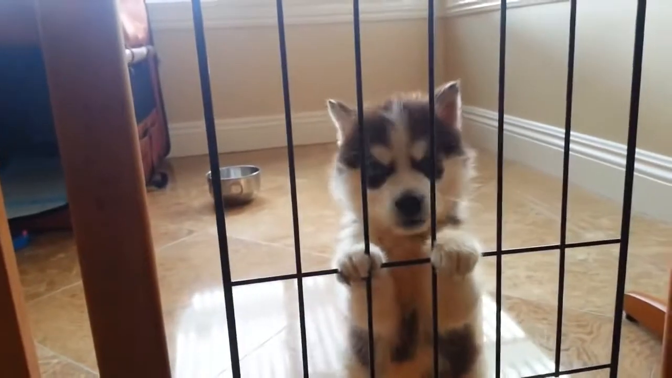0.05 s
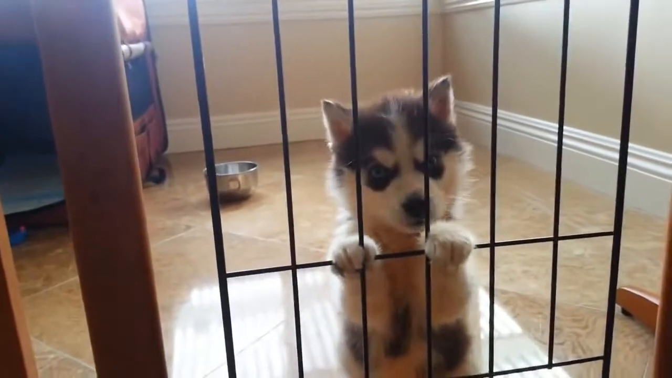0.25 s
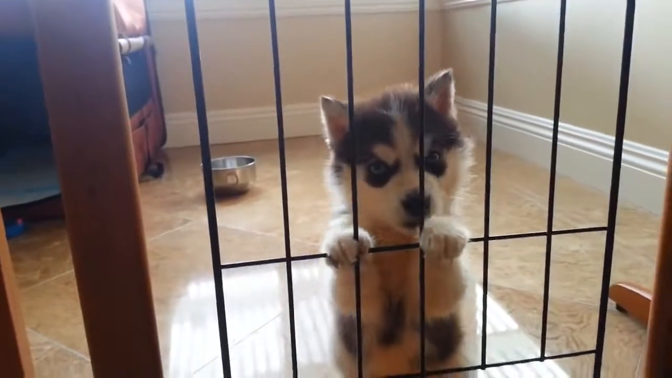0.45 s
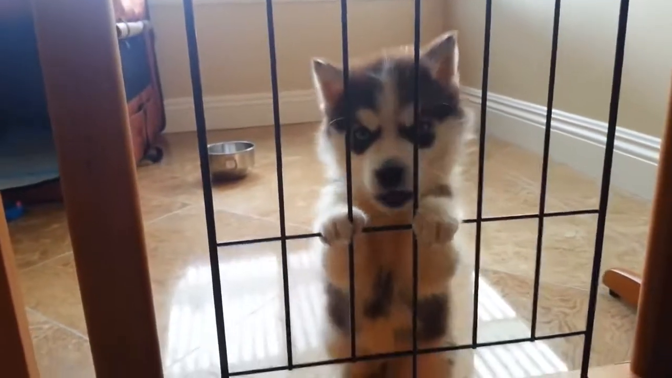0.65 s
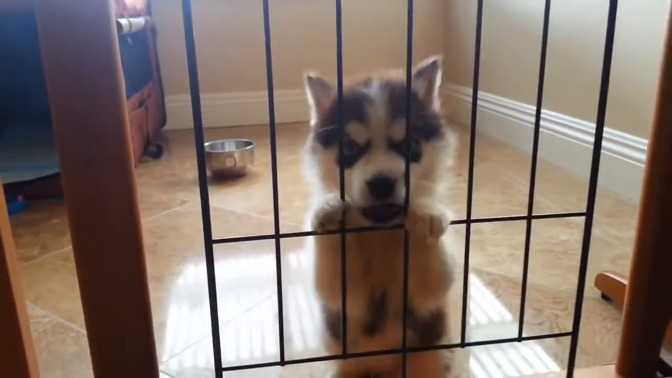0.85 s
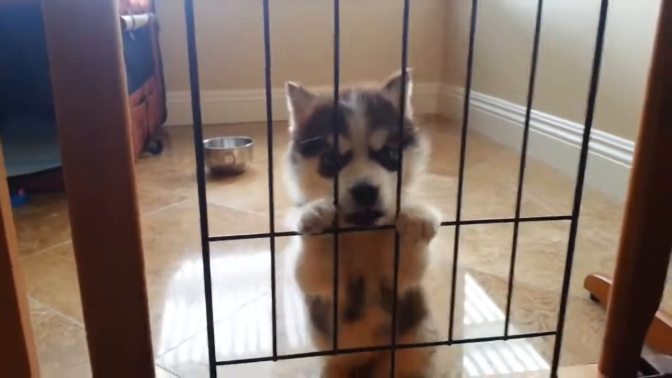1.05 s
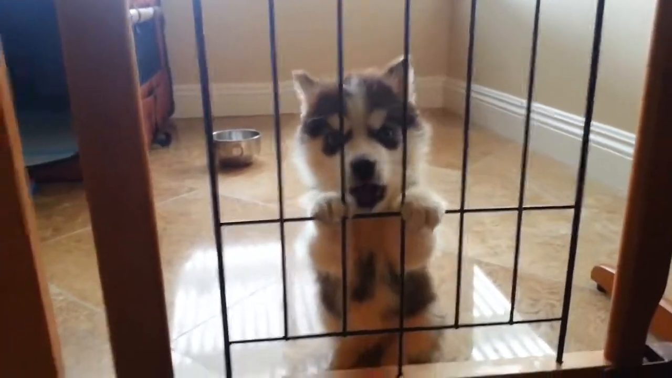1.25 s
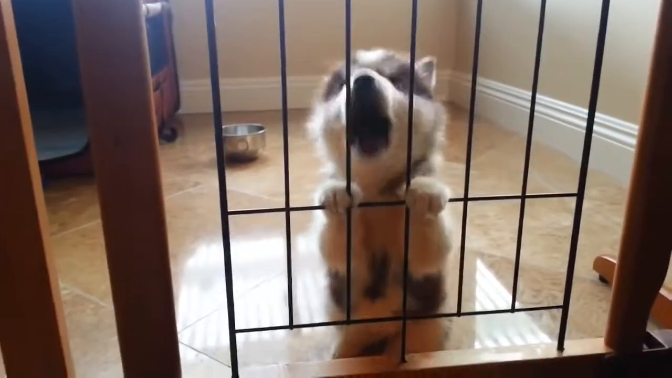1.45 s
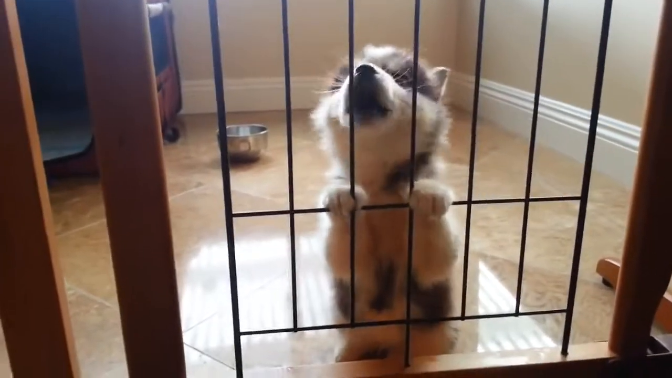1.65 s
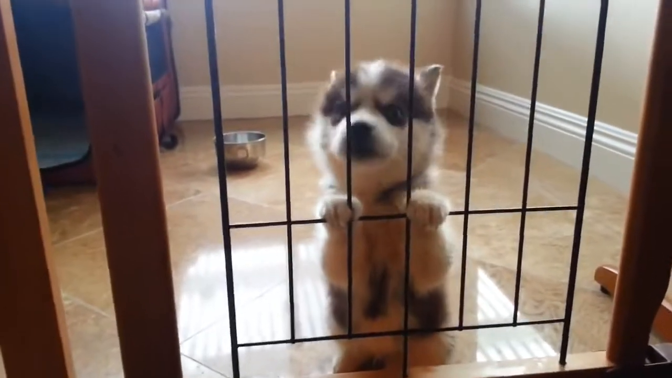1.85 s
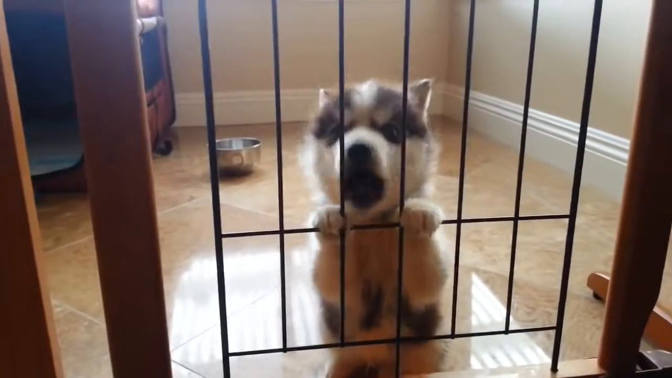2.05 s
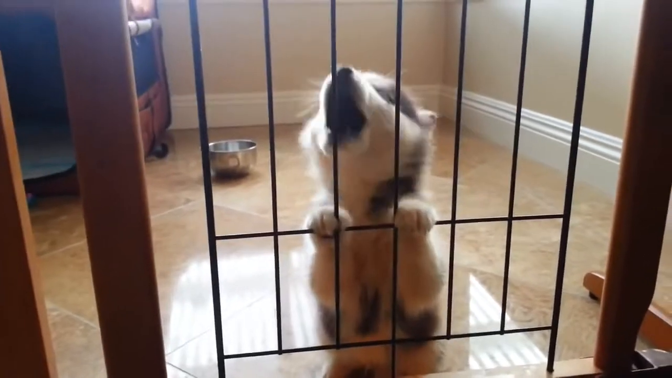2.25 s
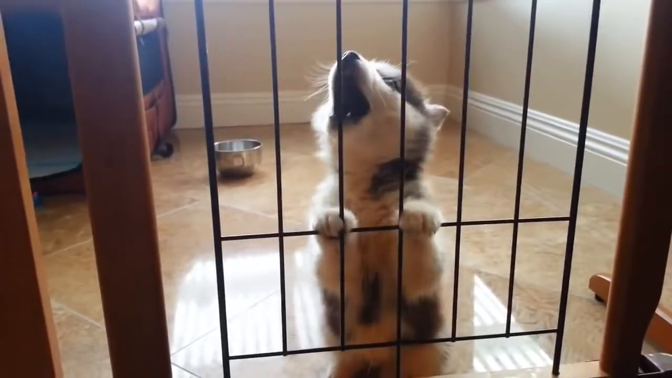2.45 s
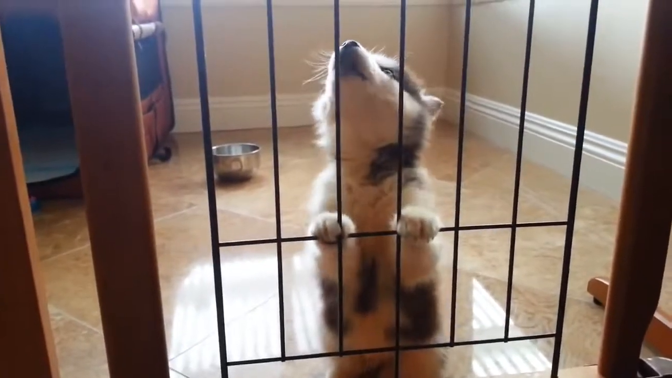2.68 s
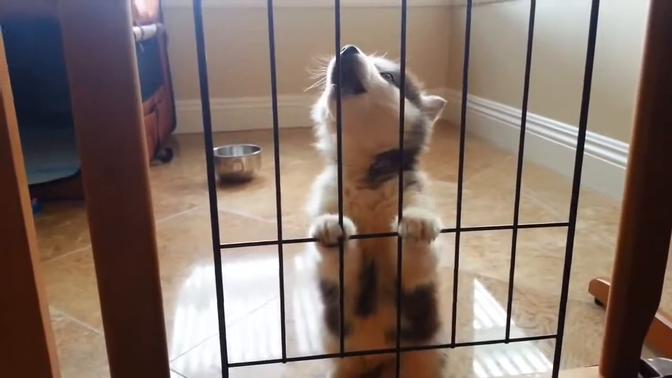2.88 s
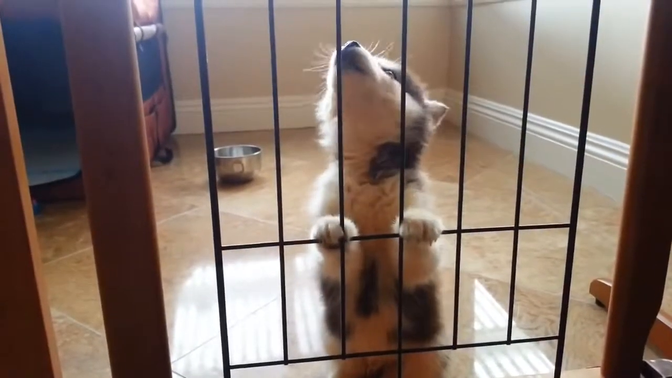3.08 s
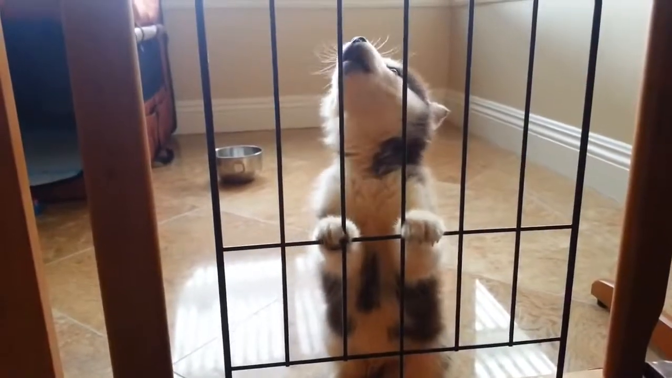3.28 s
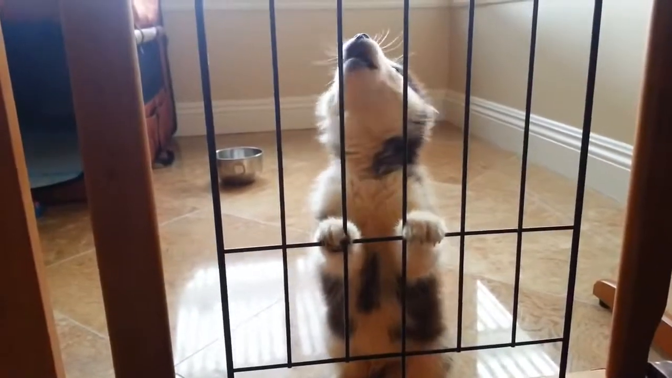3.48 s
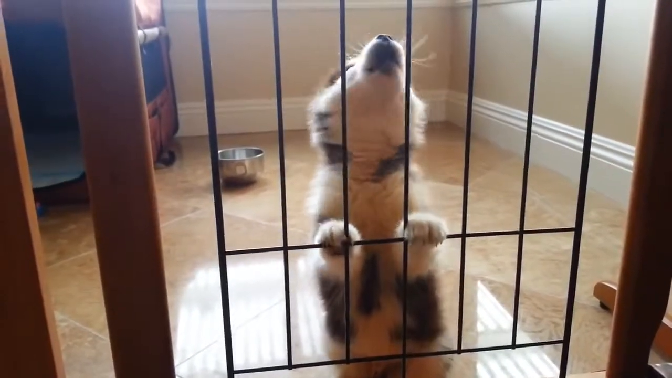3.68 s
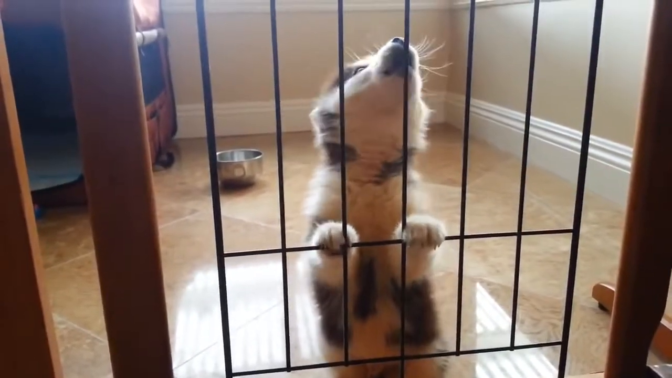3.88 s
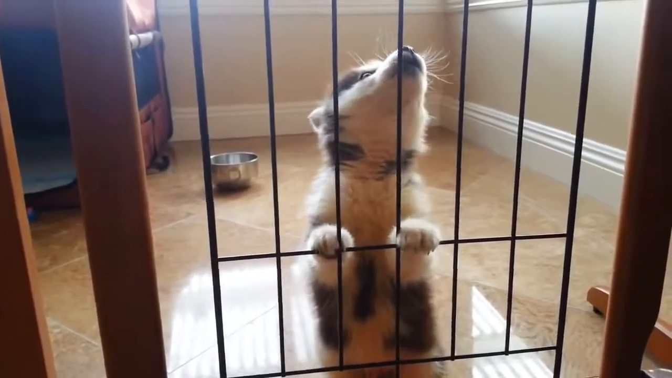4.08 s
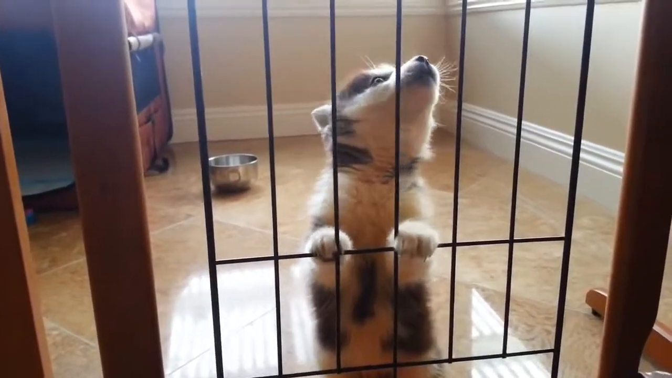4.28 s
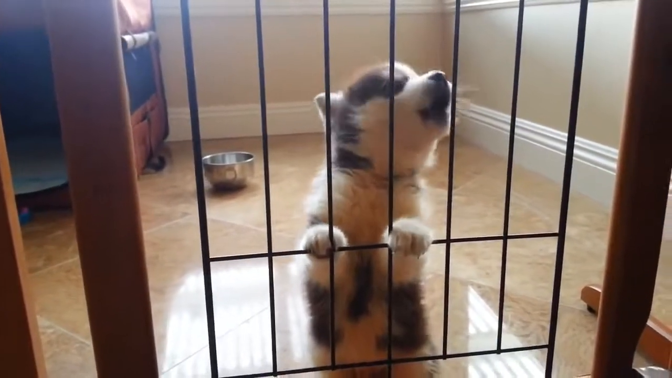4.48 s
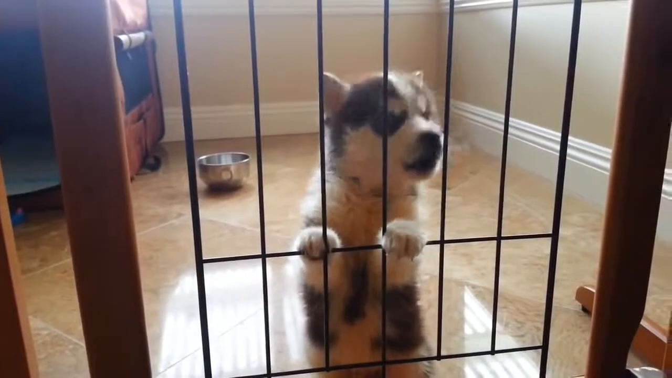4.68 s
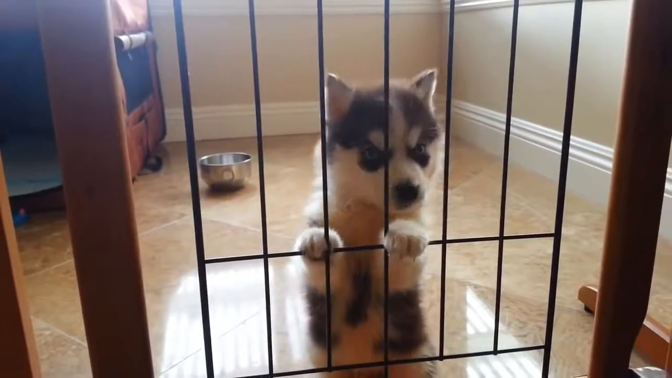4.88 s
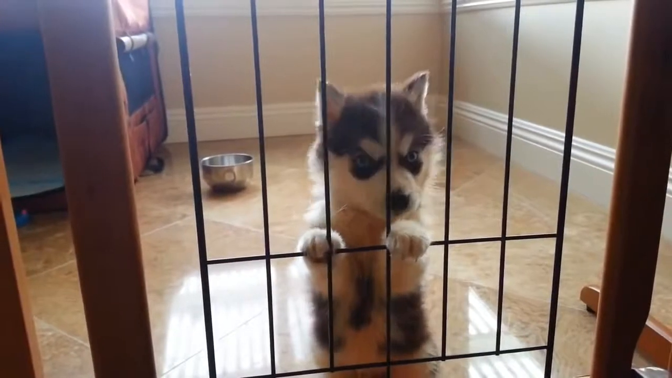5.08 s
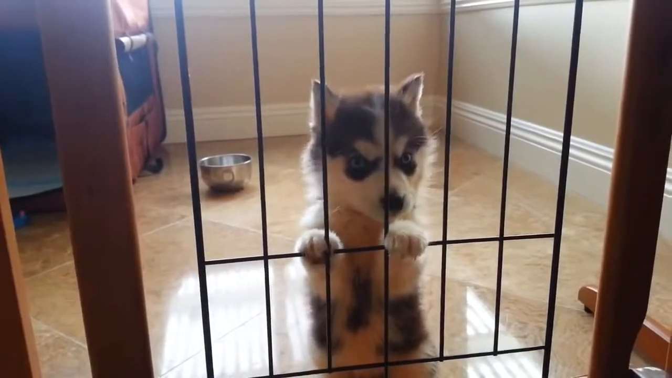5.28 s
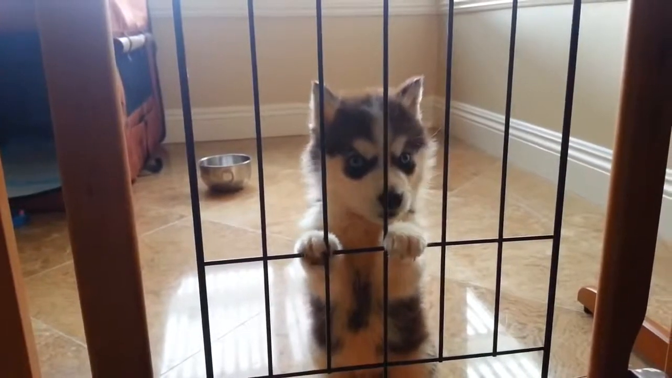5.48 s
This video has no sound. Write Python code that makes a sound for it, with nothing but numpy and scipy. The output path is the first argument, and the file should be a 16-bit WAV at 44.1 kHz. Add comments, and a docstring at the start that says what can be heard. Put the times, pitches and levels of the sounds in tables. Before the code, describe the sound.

A husky puppy behind a wire gate gives a brief breathy whine, faint claw ticks and two thin squeaks. Three high, cracking yowls follow, the last two led in by raspy yaps. Another yap sinks into a moan, and after one more the puppy holds a long soft howl that ends in a tiny grunt. The microphone is close, in a small tiled room with a short ring.

```python
"""A husky puppy behind a wire gate in a small tiled room whines, ticks its paws on the wire and squeaks.
Three cracking yowls follow, the last two led in by yaps; then a yap sinks into a moan.
After one more yap it holds a long soft howl that ends in a grunt.
The voice is a stack of vocal-fold harmonics shaped by mouth, throat and head resonances.
Throughout, the walls ring briefly and the house rumbles low; two unlike microphones stand close by."""
import sys
import numpy as np
from scipy import signal
from scipy.fft import rfft, irfft
from scipy.io import wavfile
from scipy.ndimage import uniform_filter1d, minimum_filter1d, map_coordinates

SR = 44100
rng = np.random.default_rng(int(sys.argv[2]) if len(sys.argv) > 2 else 0)


def wrap_up_sound(samples):
    """Save the sound to the file named by the first command line argument, as 16-bit audio."""
    columns = np.atleast_2d(samples).T
    # keep every value between -1 and 1, then stretch to whole-number steps
    tamed = np.clip(columns, -1, 1)
    steps = np.round(tamed * 32767).astype(np.int16)
    wavfile.write(sys.argv[1], SR, steps)


N = 243873
TIME = np.arange(N) / SR

USUAL_DB, MOUTH_DB, FLICKER_DB = -20, -3, 4
HOLLOW_HZ, HOLLOW_HALF_WIDTH_HZ, TOP_HZ = 4002, 750, 14600
# voice cracks: t/s, length/s, roughness/0-1, strong-weak cycle alternation/0-1
CRACKS = [(0.911, 0.027, 0.07, .8), (1.061, 0.02, 0, .45), (1.63, 0.19, 0.05, .12),
          (2.227, 0.028, 0.22, .1), (2.377, 0.093, 0.03, .1), (2.485, 0.089, 0.23, .3),
          (3.853, 0.041, 0.03, .03)]
# overtones caught by a narrow tract resonance: t/s, half length/s, f/Hz, level/dB
FLARES = [(2.379, 0.048, 2610, -13), (3.444, 0.01, 2530, -20), (3.85, 0.32, 2540, -42),
          (4.456, 0.012, 2410, -38)]
def voice(call, mouth_hz, jitter, air_db, throat, head, throat_db, head_db, throat_reach, head_reach,
          mouth_width_hz, chest_db, wheeze_db, fade_s,
          throat_growth=0, chest_growth=0, hollow=0, top_hz=9300, head_shift=1):
    """Vocal-fold harmonics weighted by the tract. Reach: harmonic number; growth: dB per dB."""
    times, *columns = np.transpose(call)
    span = (TIME > times[0] - fade_s / 2) & (TIME < times[-1] + fade_s)
    t = TIME[span]
    pitch_hz, db, treble_db = (np.interp(t, times, c) for c in columns)
    rough, split = sum(np.outer(amounts, np.exp(-(2 * (t - s) / length_s) ** 4))
                       for s, length_s, *amounts in CRACKS)
    # strained folds lose their regular beat
    hz = pitch_hz * (1 + jitter * wobble(t, 110) + 0.06 * rough * wobble(t, 700))
    phase = 2 * np.pi * np.cumsum(hz) / SR
    k = np.arange(1, 29)[:, None]
    f = k * hz
    # on high notes the jaw drops: the mouth tracks harmonic 2 and narrows
    lips_hz, shift = (np.broadcast_to(control, N)[span] for control in (mouth_hz, head_shift))
    mouth = resonance(f, np.maximum(lips_hz, 2 * pitch_hz), mouth_width_hz * 550 / pitch_hz)
    flicker = undb(FLICKER_DB * np.array([wobble(t, 35) for _ in k]))
    shapes = [mouth]
    for modes, reach, factor in (throat, throat_reach, 1), (head, head_reach, shift):
        ring = sum(undb(mode_db) * resonance(f, centre * factor, width) for centre, width, mode_db in modes)
        shapes.append(flicker * ring / (1 + (k / reach) ** 5))
    mouth_db = db + MOUTH_DB
    throat_level_db = USUAL_DB + throat_db + throat_growth * (treble_db - USUAL_DB)
    power = sum(undb(2 * level_db) * shape ** 2 / np.sum(shape ** 2, axis=0)
                for shape, level_db in zip(shapes, (mouth_db, throat_level_db, treble_db + head_db)))
    for s, half_s, flare_hz, flare_db in FLARES:
        if t[0] < s < t[-1]:
            flare = undb(flare_db) * np.exp(-((t - s) / half_s) ** 2)
            power += (flare * resonance(f, flare_hz, width_hz=410)) ** 2
    power[0] += undb(2 * (chest_db + chest_growth * (mouth_db - USUAL_DB)))
    # the voice is thin in the lows and its top is cut off steeply; the nose can notch one band
    amplitude = np.sqrt(2 * power / (1 + (530 / f) ** 12 + (f / top_hz) ** 20)) * (f < TOP_HZ)
    amplitude *= 1 - hollow * np.exp(-((f - HOLLOW_HZ) / HOLLOW_HALF_WIDTH_HZ) ** 4)
    smear = (undb(air_db) + 1.7 * rough) * np.sqrt(f / 3000)
    turbulence = np.array([wobble(t, 600) + 1j * wobble(t, 600) for _ in k])
    half_harmonics = split * (k > 1) * np.exp(1j * phase / 2)
    carriers = np.exp(1j * (k * phase + 0.32 * k ** 2))
    partials = np.real((1 + smear * turbulence + half_harmonics) * carriers)
    tone = np.sum(amplitude * partials, axis=0) / np.hypot(1, split)
    # each fold opening puffs air past the teeth
    airflow = undb(treble_db) * (undb(wheeze_db) + .7 * rough) * (1 + .5 * np.cos(phase))
    wheeze = airflow * hiss(hz=8000, width_hz=2500, size=len(t))
    ramp = np.clip(np.minimum(t - t[0], t[-1] - t) / (2 * fade_s), 0, 1)
    out = np.zeros(N)
    out[span] = (tone + wheeze) * np.sin(np.pi / 2 * ramp) ** 2
    return out


YOWL_MOUTH_HZ, YOWL_JITTER = 1130, .0055
# open-jaw resonances: f/Hz, width/Hz, level/dB
THROAT_OPEN = [(2140, 340, 1.5), (3770, 1400, 5.5)]
HEAD_OPEN = [(5020, 3900, 16), (7300, 830, 1)]
OPEN_JAWS = dict(throat=THROAT_OPEN, head=HEAD_OPEN, throat_db=-1, throat_growth=2.3, throat_reach=5.54,
                 head_reach=35, mouth_width_hz=190, top_hz=8400, wheeze_db=-33, fade_s=.0045)
# yowl contours: t/s, pitch/Hz, level/dB, treble/dB
WAVERING_YOWL = [(0.899, 685, -17, -18.5), (0.907, 648, -17, -17.5), (0.921, 682, -17, -20.5),
                 (0.943, 938, -16.5, -16.5), (0.961, 959, -18.5, -14), (0.993, 873.5, -15, -22),
                 (1.031, 806, -27.5, -16.5), (1.051, 632, -12.5, -24.5), (1.093, 797, -29, -17.5),
                 (1.153, 712, -29, -19), (1.201, 697.6, -14.5, -20), (1.253, 680, -12.5, -22.5),
                 (1.273, 773, -23, -19), (1.29, 888, -9.5, -38.5)]
FALLING_YOWL = [(1.572, 1093, -19, -16.5), (1.628, 918, -8, -24), (1.722, 665, -15.5, -22),
                (1.748, 703.5, -17, -16), (1.77, 814, -13, -20), (1.79, 746.7, -13.5, -33),
                (1.816, 802, -22, -36.5), (1.852, 663, -22.5, -33.5), (1.96, 535, -34.5, -42.5)]
BREAKING_YOWL = [(2.221, 1087, -37.5, -18), (2.255, 989, -7, -21), (2.325, 797, -12.5, -23.5),
                 (2.337, 634, -29, -19), (2.363, 643.5, -27, -17), (2.399, 677.4, -17.5, -20.5),
                 (2.411, 992, -12, -16), (2.431, 1081, -21.5, -26), (2.437, 813.4, -8, -26),
                 (2.46, 1023, -16, -22), (2.519, 1080, -22, -33.5), (2.531, 758.4, -13, -18),
                 (2.595, 906, -8, -23), (2.625, 931, -5.5, -27.5), (2.667, 860.5, -14, -25),
                 (2.691, 637, -29, -44), (2.72, 572, -29.5, -31)]
# yowls: contour, fundamental/dB, head re treble/dB, hoarseness/dB
YOWLS = [(WAVERING_YOWL, -35.5, -1.5, -32.5), (FALLING_YOWL, -34, -2.5, -24.5),
         (BREAKING_YOWL, -41.5, -1.7, -31.5)]
def yowls():
    """Strained calls through open jaws."""
    return sum(voice(call, YOWL_MOUTH_HZ, YOWL_JITTER, air_db, chest_db=chest_db, head_db=head_db,
                     **OPEN_JAWS) for call, chest_db, head_db, air_db in YOWLS)


YAP_JITTER, YAP_AIR_DB = .009, -17
YAP_RISE_HZ_PER_S, YAP_LEAP_S, YAP_SWELL_DB, YAP_DULLING_DB_PER_S = 2400, 0.015, 22.5, 75
# snapping-jaw and raised-muzzle resonances: f/Hz, width/Hz, level/dB
THROAT_YAP = [(2254, 680, -6.5), (2950, 290, 15.5), (3993, 230, 14)]
HEAD_YAP = [(4400, 430, 4.45), (5800, 900, 6.3)]
THROAT_RAISED = [(2623, 310, -12), (3370, 350, 0.5)]
HEAD_RAISED = [(5640, 1200, 6.3), (7500, 5100, 4.5)]
SNAPPING_JAWS = dict(throat=THROAT_YAP, head=HEAD_YAP, throat_db=-1, throat_growth=1.8, head_db=-2.5,
                     throat_reach=14, head_reach=38.5, mouth_width_hz=390, chest_db=-42.5,
                     chest_growth=.3, top_hz=6700, wheeze_db=-19.5, fade_s=0.0051)
RAISED_MUZZLE = dict(throat=THROAT_RAISED, head=HEAD_RAISED, throat_db=3.5, throat_growth=2.7,
                     head_db=-6, throat_reach=5, head_reach=14, mouth_width_hz=560, chest_db=-39,
                     chest_growth=0.37, hollow=0.65, wheeze_db=-34, fade_s=.004)
# yaps: t/s, length/s, start pitch/Hz, leap/Hz, level/dB, treble/dB, swell/s, mouth/Hz, posture
YAPS = [(1.485, 0.095, 346, 543.5, -18, -13, 0.0093, 1292, SNAPPING_JAWS),
        (2.136, 0.083, 326, 523, -16.5, -13, 0.0065, 1186, SNAPPING_JAWS),
        (2.886, .089, 383.8, 323.4, -13, -12, 0.021, 880, RAISED_MUZZLE),
        (3.386, 0.076, 339.4, 127.5, -12, -24, 0.026, 1254, RAISED_MUZZLE)]
def yap(start_s, length_s, start_hz, leap_hz, db, treble_db, swell_s, mouth_hz, posture):
    """Raspy scoop: the pitch climbs, then leaps; the level swells while the treble dulls."""
    age = np.arange(0, length_s, 1 / SR)
    pitch_hz = start_hz + YAP_RISE_HZ_PER_S * age + leap_hz * np.exp((age - length_s) / YAP_LEAP_S)
    swell_db = -YAP_SWELL_DB * np.exp(-age / swell_s)
    dulled_db = treble_db - YAP_DULLING_DB_PER_S * age
    call = np.transpose([start_s + age, pitch_hz, db + swell_db, dulled_db + swell_db])
    return voice(call, mouth_hz, YAP_JITTER, YAP_AIR_DB, **posture)


# round-lip head resonances: f/Hz, width/Hz, level/dB
HEAD_HOWL = [(6174, 1030, 6.4), (9820, 1800, 2.7)]
ROUND_LIPS = dict(throat=THROAT_RAISED, head=HEAD_HOWL, throat_db=-44.5, head_db=-5.5, throat_reach=5.7,
                  head_reach=6.4, mouth_width_hz=160, chest_db=-37, chest_growth=0.12, hollow=0.65,
                  wheeze_db=-28.5, fade_s=0.0041)
# lip movement: t/s, mouth/Hz, factor on head resonance frequencies
LIPS = [(3.65, 1224, 1.04), (3.9, 1130, .93), (4.159, 1118, 1.04), (4.46, 1154, 1.025), (4.599, 1305, 0.95),
        (4.74, 1270, 1.16), (4.92, 1204, 1.03)]
# howl contour: t/s, pitch/Hz, level/dB, treble/dB
HOWL = [(3.618, 504, -35, -37), (3.632, 521, -24.5, -44), (3.688, 528.4, -22, -36.5),
        (3.94, 513.5, -9.5, -34), (3.984, 508.2, -20.5, -32.5), (4.072, 487.3, -16.5, -37.5),
        (4.168, 481.5, -20, -37.5), (4.34, 477.4, -24.5, -32), (4.425, 484.8, -22, -34),
        (4.458, 481, -14.5, -29), (4.51, 480.3, -18, -33.5), (4.822, 497.8, -33.5, -27),
        (4.924, 548.3, -37, -42.5), (4.945, 520, -39, -54)]
def howl():
    """Long clean note, the lips retuning the tract; a grunt ends it."""
    times, *columns = np.transpose(LIPS)
    mouth_hz, head_shift = (np.interp(TIME, times, c) for c in columns)
    note = voice(HOWL, mouth_hz, jitter=.0018, air_db=-49, head_shift=head_shift, **ROUND_LIPS)
    grunt = puff(s=4.953, db=-38.5, half_s=0.015, hz=687, width_hz=130)
    return note + grunt


# moan contour: t/s, pitch/Hz, level/dB, treble/dB
MOAN = [(2.976, 924, -11, -27), (2.992, 736, -9.5, -19.5), (3.024, 559, -35, -36), (3.19, 454, -40, -46.5),
        (3.245, 289.6, -34.5, -41)]
def moan():
    """Falling call with the muzzle raised."""
    return voice(MOAN, mouth_hz=880, jitter=YAP_JITTER, air_db=YAP_AIR_DB, **RAISED_MUZZLE)


# whine contour: t/s, pitch/Hz, level/dB, treble/dB
WHINE = [(0.0, 714, -3, -22), (0.03, 601, -36, -32.5), (0.112, 574.3, -35.5, -47.5), (0.175, 549, -54, -57)]
def whine():
    """Breathy closed-mouth call that rings high in the head."""
    closed_mouth = dict(ROUND_LIPS, head_shift=1.19, wheeze_db=-22.5)
    return voice(WHINE, mouth_hz=1460, jitter=YOWL_JITTER, air_db=-16, **closed_mouth)


# squeak contours: t/s, pitch/Hz, level/dB, treble/dB
FIRST_SQUEAK = [(0.757, 1072, -39.5, -23), (0.783, 1052, -20.5, -21), (0.818, 1147, -34.5, -27)]
SECOND_SQUEAK = [(0.876, 1034, -19.5, -19.5), (0.907, 953, -16.5, -17.5)]
def squeaks():
    """Thin calls from a tight throat, with few overtones."""
    tight_throat = dict(OPEN_JAWS, throat_reach=4.5, chest_db=-32, head_db=-22, wheeze_db=-20.5)
    return sum(voice(call, YOWL_MOUTH_HZ, YOWL_JITTER, air_db=-22, **tight_throat)
               for call in (FIRST_SQUEAK, SECOND_SQUEAK))


# nose air: t/s, level/dB, half length/s, f/Hz, width/Hz
SNORTS = [(0.005, -37, 0.049, 3400, 3500), (0.816, -43, 0.093, 7560, 1020),
          (2.913, -16.5, 0.014, 6070, 444), (4.968, -40, 0.046, 6990, 1672)]
def puff(s, db, half_s, hz, width_hz):
    """Short swell of air in one resonance."""
    return hiss(hz, width_hz) * undb(db) * np.exp(-((TIME - s) / half_s) ** 2)


# claws on the gate: t/s, level/dB, f/Hz, decay/s
TICKS = [(0.233, -28.5, 3500, 0.011), (0.633, -27, 3600, 0.0022), (4.716, -28, 7500, 0.006)]
def paws(attack_s=0.00019):
    """Claws scratch the wire, dulled by the pads."""
    ticks = np.zeros(N)
    for s, db, hz, decay_s in TICKS:
        envelope = np.exp(-np.maximum((TIME - s) / decay_s, (s - TIME) / attack_s))
        ticks += hiss(hz, width_hz=2500) * undb(db) * envelope
    return colour(ticks, hz=[8500, 12000], db=[0, -24])


# floor echo: delay/s, gain
ECHOES = [(.0019, 0.17)]
# wall ring: f/Hz, level/dB, t60/s
ROOM = [(520, -2, 0.44), (1630, -6, 0.52), (3500, -5.5, 0.55), (8000, -5, 0.087)]
def room(x):
    """Direct sound, floor echo and diffuse ring at one microphone."""
    t = TIME[:SR * 3 // 4]
    band_hz = np.array(ROOM)[:, 0]
    log_f = np.log(np.fft.rfftfreq(len(t), 1 / SR) + 1)
    onset = np.clip((t - .004) / 0.00037, 0, 1)
    response = np.zeros(len(t))
    for hz, db, t60_s in ROOM:
        tail = rng.standard_normal(len(t)) * np.exp(-np.log(1000) * t / t60_s) * onset
        share = np.interp(log_f, np.log(band_hz), band_hz == hz)
        response += undb(db) * irfft(rfft(tail) * np.sqrt(share), len(t)) / np.linalg.norm(tail)
    response[0] += 1
    for delay_s, gain in ECHOES:
        response[int(delay_s * SR)] += gain
    return signal.fftconvolve(x, response)[:N]


# house noise spectrum: f/Hz, relative level/dB
HOUSE = [(70, -21.5), (125, 3), (300, -17), (1000, -24.5), (9000, -33), (14000, -58.5)]
def house(db=-49.5, side_re_mid_db=-9.5):
    """Low rumble and faint hiss, nearly alike at both microphones."""
    mid, side = (unit(colour(rng.standard_normal(N), *np.transpose(HOUSE))) for _ in range(2))
    return (mid + undb(side_re_mid_db) * side * np.array([[1], [-1]])) * undb(db)


def undb(db):
    """Decibels to gain."""
    return 10 ** (np.asarray(db) / 20)


def unit(x):
    """Scale to rms 1."""
    return x / np.sqrt(np.mean(x ** 2))


def colour(x, hz, db):
    """Filter by a curve over log frequency."""
    f = np.fft.rfftfreq(len(x), 1 / SR)
    return irfft(rfft(x) * undb(np.interp(np.log(f + 1), np.log(hz), db)), len(x))


def resonance(f, hz, width_hz):
    """Steep resonance, gain 1 at its centre."""
    return 1 / (1 + ((f * f - hz * hz) / (f * width_hz)) ** 2)


def hiss(hz, width_hz, size=N):
    """Noise in one resonance, rms 1."""
    gain = resonance(np.fft.rfftfreq(size, 1 / SR) + 1, hz, width_hz)
    return unit(irfft(rfft(rng.standard_normal(size)) * gain, size))


def wobble(t, rate_hz):
    """Smooth random drift, rms about 1."""
    step = int(SR / rate_hz)
    held = np.repeat(rng.standard_normal(N // step + 2), step)
    return unit(uniform_filter1d(held, step))[:len(t)]


def scene(right_lag_s=.00006):
    """Pup and paws in the room, reaching the left microphone first, over the house noise."""
    pup = whine() + squeaks() + sum(yap(*row) for row in YAPS) + yowls() + moan() + howl()
    snorts = sum(puff(*row) for row in SNORTS)
    left = pup + snorts + paws()
    right = map_coordinates(left, [np.arange(N) - right_lag_s * SR], order=3)
    return np.array([room(left), room(right)]) + house()


def suppress(x, open_db=-45, range_db=7.5, depth_db=23, window_s=0.094):
    """Noise suppressor: lowers the pauses."""
    power = uniform_filter1d(np.mean(x ** 2, axis=0), int(window_s * SR))
    level_db = 10 * np.log10(np.abs(power) + 1e-12)
    quiet = np.clip((open_db - level_db) / range_db, 0, 1)
    return x * undb(-depth_db * uniform_filter1d(quiet, SR // 20))


PEAK_CEILING, LIMITER_SAMPLES = .92, SR // 400
# microphone responses: f/Hz, left/dB, right/dB
MICS = [(160, -2, -0.27), (424, 4, 3.5), (1560, -3, 4.5), (2956, -7.5, -3.5), (4220, -1, -6), (5600, 4, -1),
        (7360, -15, 5.5), (8300, -9.5, 5), (11300, 0, 7.5)]
def record(dry):
    """Microphone colour, noise suppressor, fast limiter, low-pass."""
    hz, *sides_db = np.transpose(MICS)
    heard = suppress(np.array([colour(x, hz, db) for x, db in zip(dry, sides_db)]))
    gain = PEAK_CEILING / np.maximum(np.abs(heard), PEAK_CEILING)
    heard *= uniform_filter1d(minimum_filter1d(gain, LIMITER_SAMPLES), LIMITER_SAMPLES)
    return signal.sosfilt(signal.ellip(8, .2, 70, TOP_HZ, fs=SR, output="sos"), heard)


dry = scene()
out = record(dry)
wrap_up_sound(out)
```